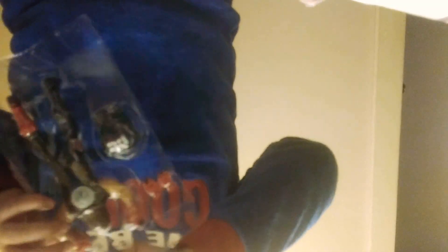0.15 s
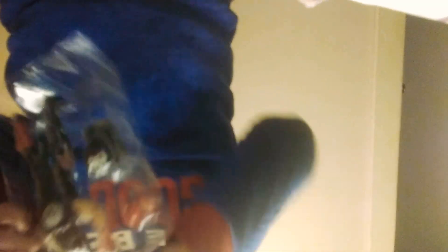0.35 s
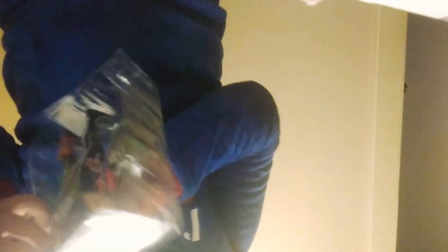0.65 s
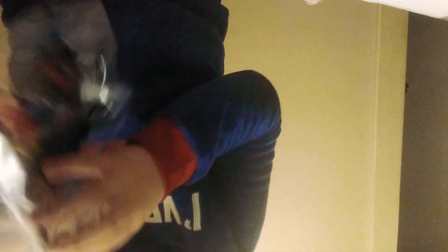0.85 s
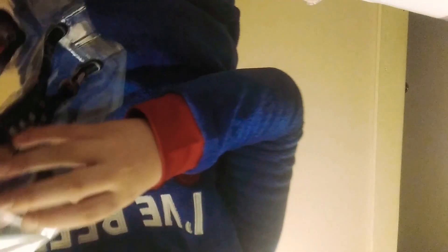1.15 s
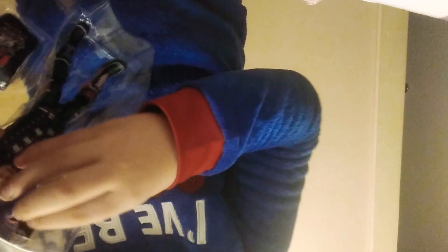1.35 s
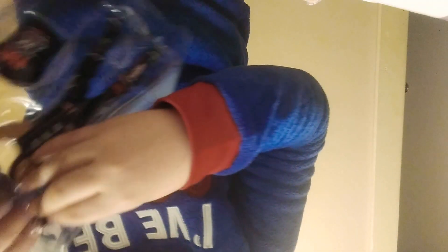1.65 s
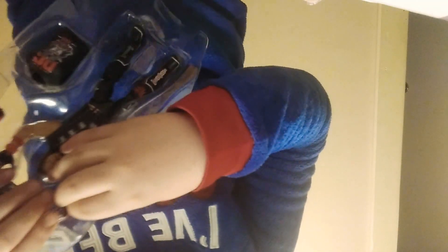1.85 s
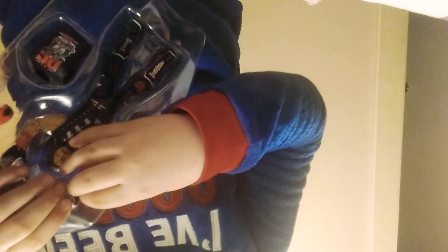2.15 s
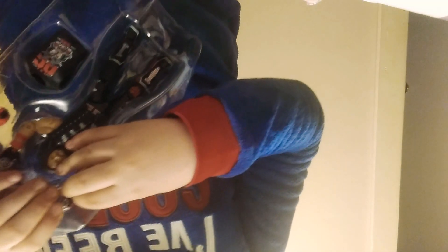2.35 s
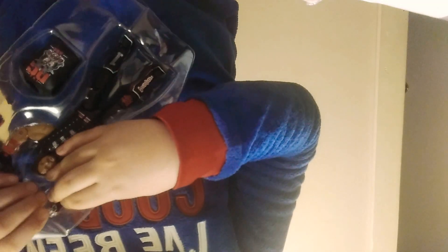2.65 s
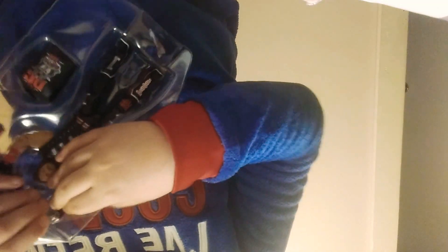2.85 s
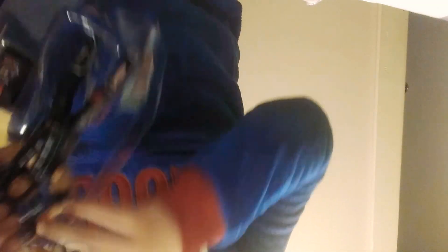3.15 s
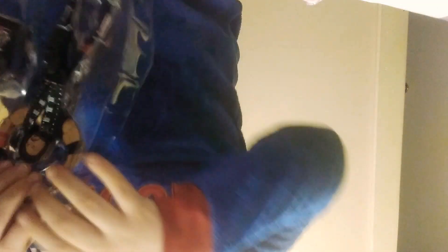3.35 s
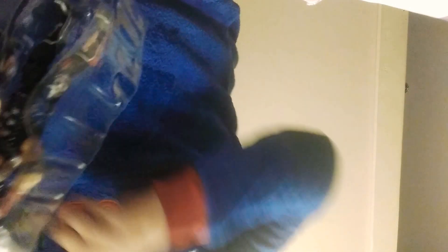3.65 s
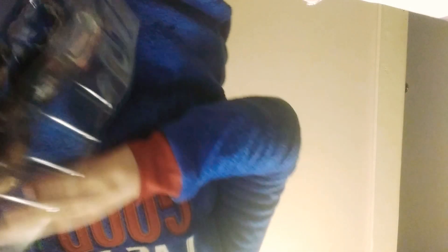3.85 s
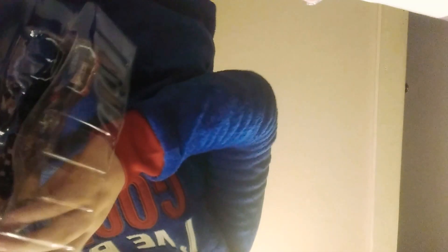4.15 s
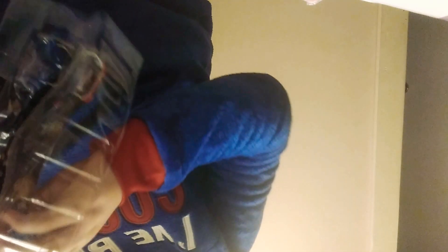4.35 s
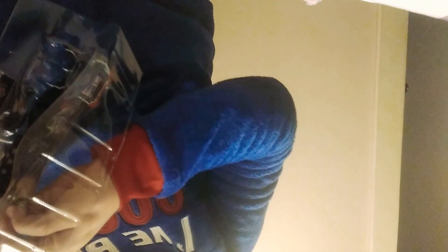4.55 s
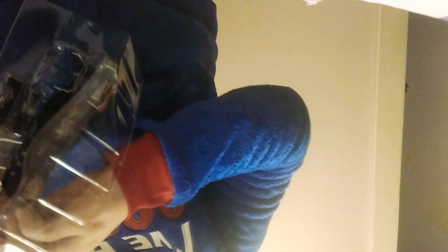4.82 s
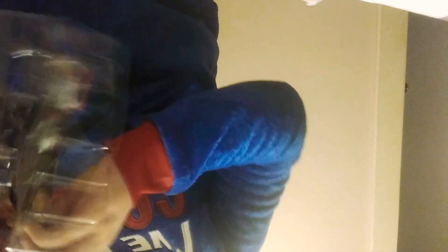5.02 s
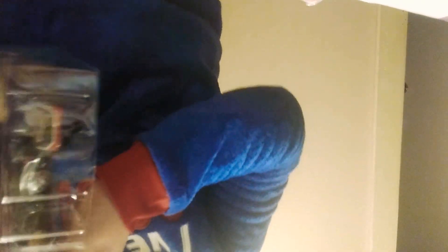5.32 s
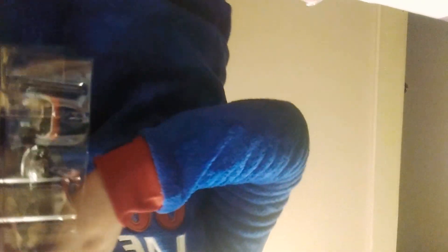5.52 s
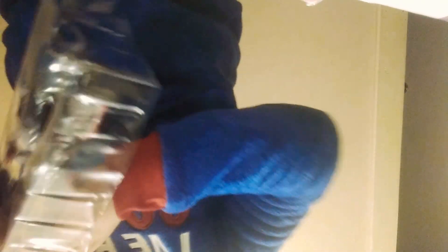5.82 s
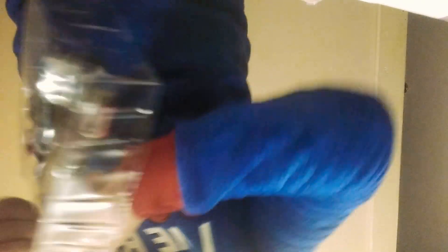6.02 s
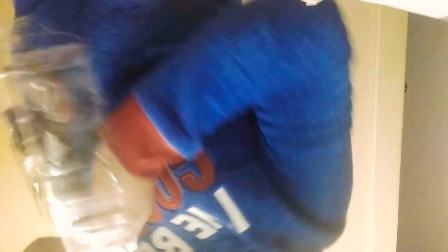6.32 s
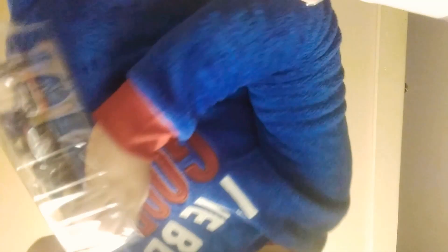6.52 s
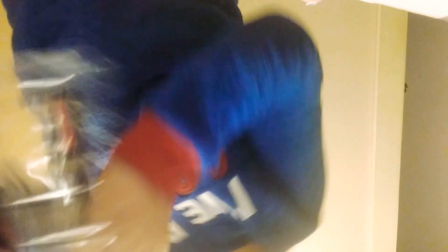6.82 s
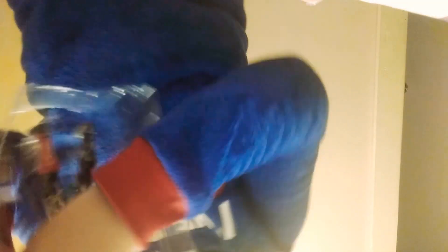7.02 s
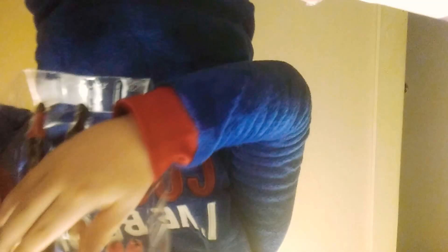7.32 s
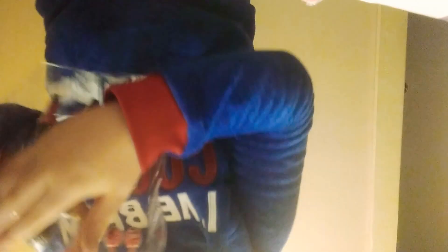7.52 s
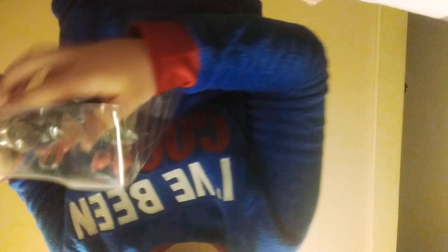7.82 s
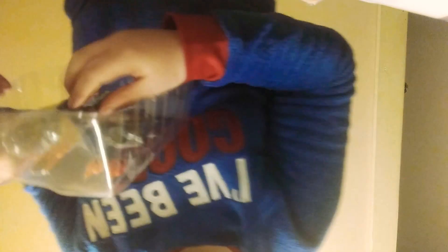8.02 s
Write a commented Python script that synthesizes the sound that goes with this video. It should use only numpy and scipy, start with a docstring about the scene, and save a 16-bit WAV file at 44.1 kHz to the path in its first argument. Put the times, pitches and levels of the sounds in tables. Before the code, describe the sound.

A stiff plastic tray crackles, pops and snaps in uneven bursts as hands bend it, close up in a quiet room.

```python
"""Bending a stiff plastic tray

Hands bend a moulded tray close to a small microphone in a quiet room. Hollow panels buckle and
excite the tray's modes with a pop; sharp creases snap with a tick; around them the sheet crackles
and rustles. The moving tray pushes air at the microphone, whose noise suppressor closes in pauses."""
import sys
import numpy as np
from scipy import signal
from scipy.io import wavfile
from scipy.ndimage import uniform_filter1d

SR = 44100
rng = np.random.default_rng(int(sys.argv[2]) if len(sys.argv) > 2 else 0)


def inscribe(sig):
    """Save sig as 16-bit PCM at rate SR to the path in sys.argv[1].

    A 1-D sig is mono; a 2-D sig holds one channel per row.
    Samples are clipped to [-1, 1] before scaling.
    """
    pcm = np.round(np.clip(np.atleast_2d(sig).T, -1, 1) * 32767)
    wavfile.write(sys.argv[1], SR, pcm.astype(np.int16))


N = 360297

# Panels buckling: start_s, level_db, pitch_hz, upper_modes_db
BUCKLINGS = [(0.0, -4.5, 552, -8), (0.153, -22, 1020, 1), (0.167, -31, 466, 6), (0.183, -40, 1220, 6),
             (0.208, -26.5, 626, 8.5), (0.251, -25, 1180, -5.5), (0.27, -32, 700, 13.5),
             (0.308, -19, 695, -34), (0.326, -7, 631, -9), (0.498, -34.5, 734, 4), (0.523, -29.5, 860, 2.5),
             (0.553, -27.5, 850, 4), (0.58, -28, 880, -0.5), (0.633, -18, 494, -8),
             (0.727, -22.5, 550, 2.5), (0.782, -11.5, 703, -6.5), (0.82, -2.5, 667, 1),
             (0.867, -52, 596, -3), (0.932, -25, 630, -7), (1.018, -50, 3780, -4), (1.089, -19.5, 370, -17),
             (1.179, -20, 420, 0), (1.214, -29.5, 2480, 3), (1.273, -14.5, 466, -6.5),
             (1.303, -12, 448, -25), (1.496, -22.5, 508, 0), (1.605, -14, 412, -8), (1.63, -17, 447, -0.5),
             (1.742, -28.5, 870, -22), (1.769, -15.5, 495, -39), (1.805, -26, 740, 0), (2.084, -29, 900, 4),
             (2.181, -22, 681, -7.5), (2.211, -4.5, 682, -4.5), (2.279, -26.5, 805, -7),
             (2.324, -12, 880, -8), (2.386, -11, 877, -3), (2.407, -20.5, 1220, -3), (2.456, -17, 740, -4),
             (2.496, -29.5, 714, -10), (2.511, -17.5, 800, -2.5), (2.548, -17.5, 688, -12),
             (2.568, -4, 890, -0.5), (2.624, -26, 690, -10), (2.661, -14, 616, -11.5),
             (2.684, -16.5, 656, -17), (2.733, -14, 595, -8), (2.776, -19.5, 610, -17),
             (2.817, -23, 760, -26.5), (2.835, -23, 780, -8), (2.843, -9, 624, -8), (2.966, -27, 590, -1),
             (2.982, -15.5, 464, -2), (3.01, -9.5, 630, -3.5), (3.037, -17, 630, -7),
             (3.062, -22, 686, -10.5), (3.123, -13, 434, -26), (3.136, -4.5, 603, -5.5),
             (3.241, -2, 575, -11.5), (3.298, -24, 490, -21), (3.342, -20.5, 1960, -13),
             (3.35, -22, 1890, -5.5), (3.404, -27, 860, 3), (3.449, -22, 1930, -14), (3.462, -22, 2010, -3),
             (3.548, -38, 900, -4), (3.632, -50, 1010, 2), (3.709, -26, 700, -2.5), (3.724, -19, 704, -11),
             (3.768, -16.5, 336, -36), (3.901, -3, 426, -16), (3.955, -32.5, 583, -31.5),
             (3.977, -26, 500, -28), (4.083, -12.5, 760, -9), (4.132, -21.5, 600, -6),
             (4.181, -14, 673, -7), (4.199, -8, 452, -8.5), (4.24, -18, 560, 1), (4.257, -31.5, 452, -17.5),
             (4.278, -10.5, 1230, -18.5), (4.32, -20.5, 920, -1.5), (4.345, -19.5, 663, -18.5),
             (4.37, -22, 400, -34.5), (4.396, -34, 900, -18), (4.427, -16, 754, 0), (4.465, -18, 903, 2.5),
             (4.498, -22, 540, 3), (4.529, -17.5, 795, -1.5), (4.544, -17, 630, -10),
             (4.562, -12.5, 880, -9), (4.573, -4, 901, 3.5), (4.656, -22, 580, -5.5), (4.674, -26, 600, 0),
             (4.682, -6.5, 702, -3), (4.73, -20.5, 650, -4), (4.788, -19.5, 439, -9.5),
             (4.814, -20.5, 1220, 9.5), (4.865, -27.5, 452, -0.5), (4.878, -22.5, 1210, -1),
             (4.956, -19.5, 608, -4), (4.978, -22.5, 690, -14), (5.034, -16, 476, -8),
             (5.065, -1.5, 632, -3), (5.081, -9, 593, 0), (5.096, -7, 447, -19), (5.11, -16.5, 472, -49),
             (5.138, -19, 404, -30), (5.209, -34.5, 2515, -9), (5.41, -26.5, 537, -5),
             (5.433, -20, 783, -2), (5.443, -28.5, 448, -4), (5.543, -45, 1213, -17),
             (5.699, -42.5, 833, -1), (5.935, -10, 700, -5), (5.954, -19.5, 585, 2),
             (5.968, -13.5, 460, 12), (6.102, -38.5, 794, 1), (6.151, 0, 1165, 0), (6.188, -14.5, 1070, 1),
             (6.216, -19.5, 520, -5), (6.323, -31.5, 1400, -9), (6.379, -10.5, 2480, 7),
             (6.428, -15.5, 1360, -1), (6.441, -16, 465, 1), (6.604, -27, 550, -26),
             (6.651, -25, 2390, 7.5), (6.675, -29, 750, -20), (6.696, -25.5, 750, -33),
             (6.732, -12.5, 550, -8.5), (6.853, -7.5, 460, 1.5), (6.91, -22, 1254, 7.5),
             (7.014, -45, 700, -15), (7.104, -33.5, 434, -38), (7.201, -36, 301, -23),
             (7.236, -42, 1010, -1), (7.113, -38, 1940, -10), (7.275, -29, 865, -6), (7.427, -37, 900, -48),
             (7.461, -22.5, 257, -16), (7.507, -37.5, 243, -33), (7.63, -35, 2360, -10),
             (7.64, -37.5, 798, 3.5), (7.698, -44, 900, 10), (7.747, -41.5, 757, 13),
             (7.785, -31, 429, -22), (7.86, -38.5, 1265, 12), (7.994, -38, 1160, -19.5),
             (8.013, -28, 1170, 2.5), (8.143, -24, 715, 6)]
# Creases snapping: start_s, level_db
SNAPS = [(0.001, -26.5), (0.0568, -35), (0.105, -33), (0.1526, -36.5), (0.2056, -13.5), (0.249, -17.5),
         (0.2702, -16.5), (0.2935, -24.5), (0.327, -11.5), (0.394, -39), (0.4957, -41), (0.5225, -26.5),
         (0.557, -31.5), (0.567, -21.5), (0.5792, -25.5), (0.635, -31.5), (0.649, -24.5), (0.6842, -25),
         (0.723, -15), (0.761, -23.5), (0.78, -5), (0.787, -21), (0.8168, -3), (0.865, -25), (0.926, -31.5),
         (0.949, -34), (1.021, -19), (1.0475, -23.5), (1.0602, -25), (1.0757, -17.5), (1.084, -27),
         (1.1013, -29), (1.11, -33), (1.1135, -23), (1.1794, -25), (1.2813, -17), (1.286, -26),
         (1.4947, -23.5), (1.598, -9.5), (1.628, -18.5), (1.745, -21.5), (1.7685, -32), (1.8059, -28),
         (1.861, -25.5), (1.9033, -28.5), (2.0903, -27.5), (2.1995, -21.5), (2.2052, -12.5), (2.214, -11.5),
         (2.243, -13.5), (2.2826, -29.5), (2.324, -18.5), (2.3366, -22.5), (2.3595, -14), (2.37, -17),
         (2.387, -17.5), (2.393, -21), (2.417, -36.5), (2.4346, -12), (2.463, -25), (2.481, -26.5),
         (2.512, -22.5), (2.535, -21.5), (2.55, -13.5), (2.569, -11), (2.616, -28.5), (2.638, -5.5),
         (2.664, -22), (2.679, -23), (2.7046, -7), (2.777, -26.5), (2.785, -34), (2.7962, -19),
         (2.806, -29), (2.8461, -19), (2.865, -31.5), (2.897, -36), (2.9208, -18.5), (2.9322, -16.5),
         (2.957, -19), (2.976, -29), (3.002, -17.5), (3.01, -15.5), (3.0134, -22), (3.032, -15.5),
         (3.043, -19), (3.0737, -29), (3.0815, -20), (3.1234, -28), (3.13, -27), (3.1359, -5),
         (3.149, -13.5), (3.2434, -20.5), (3.342, -22), (3.349, -28), (3.4, -26), (3.424, -40),
         (3.448, -21.5), (3.4634, -23), (3.549, -37.5), (3.7, -25.5), (3.712, -25), (3.725, -16),
         (3.766, -19.5), (3.8007, -23.5), (3.8296, -18.5), (3.882, -16.5), (3.8936, -18.5), (3.902, 0),
         (3.915, -34), (3.9385, -14), (3.97, -14), (4.0347, -13.5), (4.0444, -19), (4.079, -15),
         (4.0916, -16), (4.104, -24.5), (4.113, -21.5), (4.134, -21), (4.2, -14), (4.206, -11.5),
         (4.2465, -15), (4.28, -1.5), (4.2893, -11), (4.34, -20.5), (4.345, -19.5), (4.358, -21.5),
         (4.421, -24.5), (4.425, -12), (4.464, -17.5), (4.4982, -14.5), (4.502, -17.5), (4.522, -16),
         (4.527, -20), (4.541, -32.5), (4.559, -11.5), (4.5707, -1.5), (4.5755, -14), (4.6836, -9.5),
         (4.783, -14), (4.814, -8), (4.847, -22), (4.879, -31), (4.957, -24), (4.981, -15), (4.989, -26.5),
         (5.007, -11), (5.0166, -12), (5.0229, -25.5), (5.031, -16.5), (5.0414, -16), (5.05, -4),
         (5.057, -6.5), (5.07, -5.5), (5.084, -15), (5.091, -17), (5.104, -30), (5.184, -34), (5.293, -47),
         (5.347, -37), (5.391, -35.5), (5.4536, -35), (5.465, -30), (5.5577, -40.5), (5.9513, -15),
         (5.96, -22.5), (5.968, -4.5), (6.013, -19), (6.15, -8.5), (6.1885, -10.5), (6.213, -24.5),
         (6.343, -31), (6.359, -25), (6.367, -24), (6.3782, -16.5), (6.417, -29), (6.423, -29),
         (6.427, -26), (6.441, -16), (6.47, -12), (6.507, -24), (6.554, -22), (6.568, -26), (6.5863, -16),
         (6.6305, -17), (6.6537, -21), (6.6703, -29), (6.8512, -14.5), (7.0152, -33), (7.1105, -27.5),
         (7.14, -34), (7.1517, -19), (7.284, -36.5), (7.439, -44), (7.451, -33.5), (7.465, -42),
         (7.561, -38), (7.698, -52), (7.746, -40.5), (7.7771, -26), (7.783, -43), (7.85, -36.5),
         (7.8599, -34), (8.012, -32.5), (8.0146, -24), (8.0966, -29), (8.1384, -25.5), (8.155, -21.5),
         (8.1635, -32)]


def panel_pops(focus_db_per_octave, scatter_db, flex, waver, rise_cycles, slip_db, slip_s):
    """Snap-through buckling excites the tray's damped modes, most strongly near the panel's pitch.
    The grip detunes them for each pop, flexing makes them waver, and the fold settles in slips."""
    # Modes of the tray: frequency_hz, level_db, t60_s
    tray_modes = [(373, -12.5, 0.03), (452.7, 0.5, 0.055), (550, -3, 0.035), (634, 2.5, 0.03),
                  (740, 7, 0.019), (880, 7, 0.013), (1054, -4.5, 0.011), (1224, 7, 0.02), (1430, 1, 0.021),
                  (1960, 7, 0.0078), (2190, 1.5, 0.018), (2600, 3, 0.016), (3020, -0.5, 0.016),
                  (3870, 5, 0.0078)]
    mode_hz, mode_db, t60 = np.transpose(tray_modes)[:, :, None]
    t = np.arange(round(.09 * SR)) / SR
    out = np.zeros(N + 2 * len(t))
    variations = rng.standard_normal((len(BUCKLINGS), 3, len(tray_modes), 1))
    slips = rng.random((len(BUCKLINGS), 2, 12))
    steps = rng.standard_normal((len(BUCKLINGS), len(tray_modes), len(t) // 8 + 1))
    walks = np.cumsum(steps, axis=2).repeat(8, axis=2)
    for buckling, variation, (earliness, size), walk in zip(BUCKLINGS, variations, slips, walks):
        start_s, level_db, pitch_hz, upper_modes_db = buckling
        strength, bend, phase = variation
        hz = mode_hz * (1 + flex * bend)
        own = np.argmin(np.abs(mode_hz - pitch_hz))   # this mode takes the panel's own note
        hz[own] = pitch_hz
        octaves_away = np.abs(np.log2(hz / pitch_hz))
        share_db = np.where(mode_hz > 1500, upper_modes_db - 5.5, -4 - focus_db_per_octave * octaves_away)
        share_db[own] = -1 - np.minimum(mode_db[own], 0)   # the own note always speaks
        ring_s = t60 * from_db(0.03 * (level_db + 9.5))   # the fingers damp weak pops
        ring_s[own] = np.maximum(ring_s[own], 5 / pitch_hz + .011)   # at least 5 cycles plus 11 ms
        envelope = from_db(level_db + mode_db + share_db + scatter_db * strength - 60 * t / ring_s)
        swell = 1 - np.exp(-t * np.minimum(hz, 750) / rise_cycles)   # the fold runs across the panel
        wander = waver * hz / 5000 * walk[:, :len(t)]
        pop = np.sum(envelope * swell * np.sin(2 * np.pi * hz * t + 2 * phase + wander), axis=0)
        slip_lags = np.minimum(slip_s * -np.log(earliness) * SR, len(t)).astype(int)
        slip_gains = from_db(slip_db) * (2 * size - 1) * np.sqrt(earliness)   # late slips are weak
        for lag, gain in [(0, 1), *zip(slip_lags, slip_gains)]:
            i = int(start_s * SR) + lag
            out[i:i + len(t)] += gain * pop
    return out[:N]


def crease_ticks(t60, tone_share, rasp_db, rasp_t60):
    """A brief snap has a broad spectrum: noise around the crease's resonance, then a flexing rasp."""
    t = np.arange(round(.06 * SR)) / SR
    noise = rng.standard_normal((len(SNAPS), len(t) + 2))
    out = np.zeros(N + len(t))
    for (start_s, level_db), (pitch, length, *white) in zip(SNAPS, noise):
        tone = unit_rms(resonator(np.array(white), 6500 * from_db(1.2 * pitch), t60=0.0012))
        tone_gain = tone_share * from_db(-.2 * (level_db + 15))   # weak snaps are mostly ring
        attack = np.minimum(t / (0.0006 * from_db(3.7 * length)), 1)
        decay = from_db(-60 * t / (t60 * from_db(2 * length)))
        rasp = from_db(rasp_db - 60 * t / rasp_t60)
        snap = (tone_gain * tone + bandpass(white, 2700, 11000)) * (decay + rasp) * attack
        i = int(start_s * SR)
        out[i:i + len(t)] += from_db(level_db + 7) * snap / np.max(np.abs(snap))
    return out[:N]


def hollow_crackle(level_db):
    """Many small panels buckle, each a damped resonator; those near 720 Hz are the strongest."""
    clicks = impulses(per_s=1300, spread_db=4.4, clump_db=2.5)
    panel = rng.integers(0, 30, N)
    crackle = 0
    for k, hz in enumerate(np.geomspace(350, 3600, 30)):
        gain = from_db(-4 * np.abs(np.log2(hz / 720)))
        crackle += gain * resonator(clicks * (panel == k), hz, t60=16 / hz)
    return from_db(level_db - 4) * unit_rms(crackle)


def fine_crackle(level_db):
    """Dense impulses ring tiny creases across the treble, most strongly from 5 to 8 kHz."""
    clicks = impulses(per_s=2400, spread_db=6, clump_db=4)
    crease = rng.integers(0, 18, N)
    crackle = 0
    for k, hz in enumerate(np.geomspace(1500, 15500, 18)):
        gain = from_db(7.4 * min(np.log2(hz / 5000), 0) - 4 * max(np.log2(hz / 8000), 0))
        crackle += gain * resonator(clicks * (crease == k), hz, t60=28 / hz)
    # Light handling hardly folds the sheet, so the ticking fades faster than the rustle.
    return from_db(level_db + 0.9 * (level_db + 40.5)) * unit_rms(crackle)


def sliding_rustle(hollow_db, fine_db):
    """Friction of skin and loose film on the sheet makes patchy noise in a dull and a bright band."""
    white = rng.standard_normal((2, N))
    dull = from_db(hollow_db - 21.5 + 11.77 * drift(30)) * unit_rms(bandpass(white[0], 180, 2000))
    bright = from_db(fine_db - 8.5 + 9.8 * drift(9.2)) * unit_rms(bandpass(white[1], 2500, 15000))
    return dull + bright


def air_puffs(level_db):
    """Air displaced by the waving sheet drives two low resonances of the microphone's housing."""
    white = rng.standard_normal((2, N))
    lower = unit_rms(resonator(white[0], hz=62, t60=0.1))
    upper = unit_rms(resonator(white[1], hz=167, t60=0.027))
    return from_db(level_db) * unit_rms(lower + from_db(7) * upper)


def reverberation(x):
    """Dense wall reflections decay exponentially, each frequency band at its own rate."""
    # Room tail: low_hz, high_hz, level_db, t60_s
    room_bands = [(338, 820, -11.5, 0.19), (900, 2500, -11, 0.036), (2400, 5600, -11.5, 0.083),
                  (5200, 13000, -29, 0.42)]
    t = np.arange(round(.4 * SR)) / SR
    white = rng.standard_normal((len(room_bands), len(t)))
    response = 0
    for (low_hz, high_hz, level_db, t60), noise in zip(room_bands, white):
        envelope = from_db(-60 * t / t60) * np.clip(t / 0.0012, 0, 1) ** 2
        envelope /= np.sqrt(np.sum(envelope ** 2))
        response += from_db(level_db) * bandpass(noise, low_hz, high_hz) * envelope
    return signal.fftconvolve(x, response)[:N]


def add_swells(steady_db, events, offset_db, level_slope, rise_db_per_s, fall_db_per_s):
    """Incoherent powers add: a steady level plus a rise and fall around each event, returned in dB."""
    time_s, level_db = np.transpose(events)[:2]
    power = np.full(N, 1e-14)
    event_power = from_db(2 * (offset_db + level_slope * level_db))
    np.add.at(power, np.minimum(time_s * SR, N - 1).astype(int), event_power)
    after = signal.lfilter([1], [1, -from_db(-2 * fall_db_per_s / SR)], power)
    before = signal.lfilter([0, 1], [1, -from_db(-2 * rise_db_per_s / SR)], power[::-1])[::-1]
    return 10 * np.log10(after + before + from_db(2 * steady_db))


def impulses(per_s, spread_db, clump_db):
    """A Poisson process with a drifting rate gives clumps of clicks, uneven in size and sign."""
    sizes = from_db(spread_db * np.minimum(rng.exponential(1, N), 4)) * rng.choice([-1, 1], N)
    return sizes * (rng.random(N) < per_s * from_db(clump_db * drift(25)) / SR)


def resonator(drive, hz, t60):
    """A damped oscillator answers a unit impulse with a decaying sine of height 1."""
    r, w = from_db(-60 / (t60 * SR)), 2 * np.pi * hz / SR
    return signal.lfilter([0, np.sin(w)], [1, -2 * r * np.cos(w), r * r], drive + 1e-18)


def drift(rate_hz):
    """Low-passed noise wanders slowly, with an RMS of 1."""
    r = np.exp(-2 * np.pi * rate_hz / SR)
    return unit_rms(signal.lfilter([1], [1, -2 * r, r * r], rng.standard_normal(N + SR))[SR:])


def bandpass(x, low_hz, high_hz):
    """A Butterworth filter passes one band."""
    edges_hz = [low_hz, min(high_hz, .45 * SR)]
    return signal.sosfilt(signal.butter(2, edges_hz, "band", fs=SR, output="sos"), x)


def from_db(db):
    """Amplitude grows tenfold every 20 dB."""
    return 10 ** (np.asarray(db) / 20)


def unit_rms(x):
    """Dividing by the RMS sets the mean power to 1."""
    return x / np.sqrt(np.mean(x ** 2) + 1e-20)


def suppressor(x, threshold_db, slope, release_db_per_s, depth_db):
    """Downward expansion: the gain opens at once and sinks as the held level falls below threshold."""
    level_db = 10 * np.log10(np.abs(uniform_filter1d(x ** 2, size=200)) + 1e-12)
    fall_db = release_db_per_s * np.arange(N) / SR
    held_db = np.maximum.accumulate(level_db + fall_db) - fall_db
    return x * from_db(np.clip(slope * (held_db - threshold_db), -depth_db, 0))


def scene():
    """Tray, room and air puffs superpose; crackle follows the strain that builds around each event."""
    # Steady working of the sheet: time_s, hollow_db, fine_db, air_db
    handling = [(0.0, -52, -61.5, -53), (0.11, -62, -77.5, -71.5), (0.57, -61.5, -84, -52),
                (0.73, -28.5, -45.5, -41), (1.59, -92.5, -82, -55), (2.05, -58, -88, -83),
                (2.41, -36, -44, -56.5), (2.96, -46.5, -53.5, -73.5), (3.27, -31, -46, -36),
                (3.62, -55.5, -61.5, -86.5), (3.96, -41, -47, -56.5), (4.3, -34, -50, -56.5),
                (4.94, -49, -53.5, -71.5), (5.46, -60, -65.5, -74), (6.55, -40, -47, -78.5),
                (6.85, -46, -57.5, -56.5), (7.87, -79.5, -79, -87.5), (8.17, -47, -42.5, -77)]
    # Squeezes that crunch a patch of the sheet: peak_time_s, hollow_db, fine_db
    crunches = [(0.176, -26, -36), (0.274, -23, -34.5), (0.611, -33.5, -42), (0.725, -33, -36),
                (0.856, -28, -45), (0.928, -38.5, -55), (1.101, -38.5, -39.5), (1.29, -30, -42),
                (1.515, -36, -49.5), (1.619, -28.5, -62), (1.778, -37.5, -51.5), (2.098, -47, -45),
                (2.22, -34.5, -64), (2.4, -32.5, -49), (2.568, -21, -39), (2.72, -55, -41),
                (2.967, -31.5, -39), (3.098, -29, -54), (3.26, -46, -66.5), (3.385, -29, -42.5),
                (3.461, -36.5, -44), (3.791, -31.5, -46), (3.908, -27, -46.5), (4.1, -31, -43),
                (4.301, -43.5, -34), (4.55, -20.5, -55), (4.82, -53, -64), (5.015, -21.5, -35),
                (5.077, -17.5, -41), (5.44, -32.5, -41), (5.838, -45, -77), (5.976, -23, -38),
                (6.17, -51.5, -51), (6.338, -42.5, -48.5), (6.455, -23.5, -43), (6.874, -33, -47.5),
                (7.031, -43, -50), (7.157, -50, -44.5), (7.3, -72, -51), (7.35, -52.5, -58),
                (7.458, -42.5, -56), (7.59, -46.5, -44.5), (7.661, -62, -56), (7.8, -46, -50),
                (8.027, -34, -43), (8.151, -37.5, -60)]
    # Swings of the tray that puff air: peak_time_s, level_db
    swings = [(0, -19.5), (.17, -36), (.33, -27), (.58, -37.5), (.8, -29), (.86, -36), (1.15, -32),
              (1.29, -30), (1.38, -34.5), (1.51, -28), (1.66, -32), (1.79, -32), (2.22, -62), (2.57, -47.5),
              (2.85, -38.5), (3.13, -46.5), (3.25, -42), (3.41, -31.5), (3.77, -33.5), (3.92, -37),
              (4.59, -42), (4.67, -53.5), (5.07, -23.5), (5.42, -56), (5.96, -42), (6.17, -33), (6.45, -41),
              (6.64, -42), (6.7, -36), (6.88, -36.5), (7.11, -49), (7.47, -39.5), (7.52, -41), (8.06, -45)]
    time_s, *levels_db = np.transpose(handling)
    hollow_db, fine_db, air_db = [np.interp(np.arange(N) / SR, time_s, db) for db in levels_db]
    crunch_s, crunch_hollow_db, crunch_fine_db = np.transpose(crunches)
    crunch_shape = dict(offset_db=6.3, level_slope=1.079, rise_db_per_s=430, fall_db_per_s=258)
    hollow_db = add_swells(hollow_db, np.c_[crunch_s, crunch_hollow_db], **crunch_shape)
    fine_db = add_swells(fine_db, np.c_[crunch_s, crunch_fine_db], **crunch_shape)
    hollow_db = add_swells(hollow_db, BUCKLINGS, -24, 9, rise_db_per_s=896.5, fall_db_per_s=344)
    fine_db = add_swells(fine_db, SNAPS, -25, 2, rise_db_per_s=908, fall_db_per_s=399.5)
    air_db = add_swells(air_db, swings, 0.67, 0.97, rise_db_per_s=660, fall_db_per_s=670)
    tray = panel_pops(focus_db_per_octave=9, scatter_db=3, flex=0.047, waver=0.51,
                      rise_cycles=0.6, slip_db=-10, slip_s=0.0091)
    tray += crease_ticks(t60=0.0076, tone_share=0.5, rasp_db=-26.5, rasp_t60=0.073)
    tray += hollow_crackle(hollow_db) + fine_crackle(fine_db) + sliding_rustle(hollow_db, fine_db)
    # The small tray radiates no bass.
    tray = signal.sosfilt(signal.butter(2, 260, "high", fs=SR, output="sos"), tray)
    return (tray + reverberation(tray) + air_puffs(air_db))[None]


def record(dry):
    """The microphone adds hiss and colour; middle and treble are gated apart, and peaks saturate."""
    # Peaks and dips of the microphone's response: centre_hz, width_hz, gain_db
    microphone_bells = [(4362, 6150, -15), (7230, 2980, 11.5), (11780, 12600, -12.5)]
    hiss = from_db(-63.5) * bandpass(rng.standard_normal(N), 60, 16000)
    x = dry[0] + hiss
    for centre_hz, width_hz, gain_db in microphone_bells:
        b, a = signal.iirpeak(centre_hz, centre_hz / width_hz, SR)
        x = x + (from_db(gain_db) - 1) * signal.lfilter(b, a, x)
    # The small capsule loses the deepest bass.
    x = signal.sosfilt(signal.butter(4, 52, "high", fs=SR, output="sos"), x)
    below_treble = signal.sosfiltfilt(signal.butter(4, 4700, fs=SR, output="sos"), x)
    bass = signal.sosfiltfilt(signal.butter(2, 95, fs=SR, output="sos"), x)
    middle, treble = below_treble - bass, x - below_treble
    middle = suppressor(middle, threshold_db=-28.5, slope=0.43, release_db_per_s=320.5, depth_db=19)
    treble = suppressor(treble, threshold_db=-58.5, slope=2.5, release_db_per_s=165, depth_db=15)
    x = bass + middle + treble
    rounded = x / (1 + np.abs(x) ** 6) ** (1 / 6)
    return signal.sosfilt(signal.cheby2(20, 60, 16500, "low", fs=SR, output="sos"), rounded)[None]


dry = scene()
out = record(dry)
inscribe(out)
```